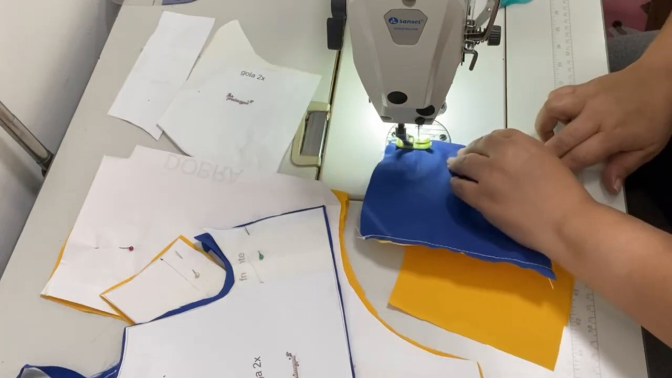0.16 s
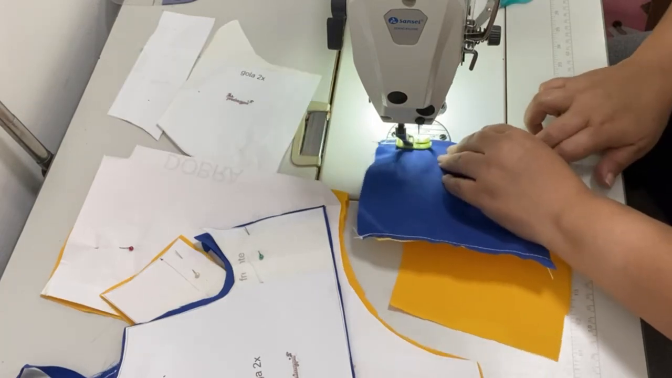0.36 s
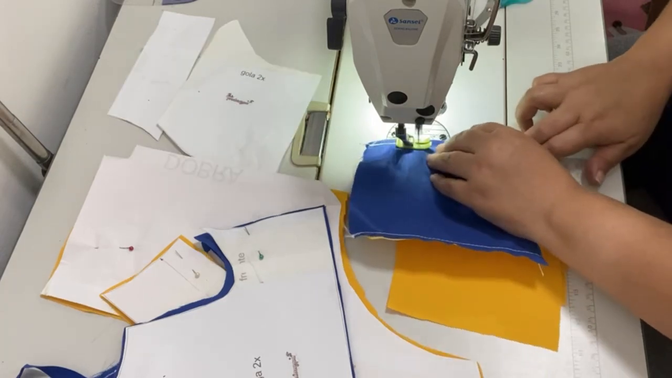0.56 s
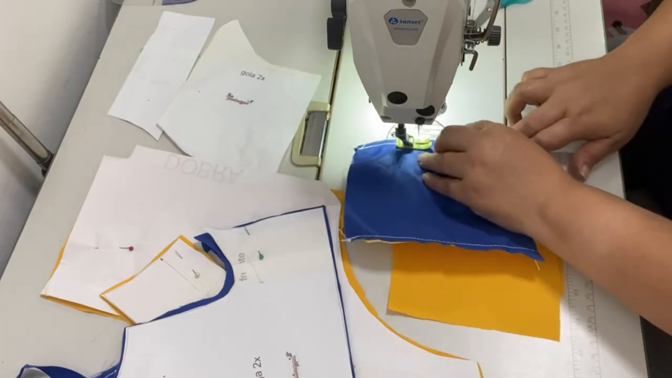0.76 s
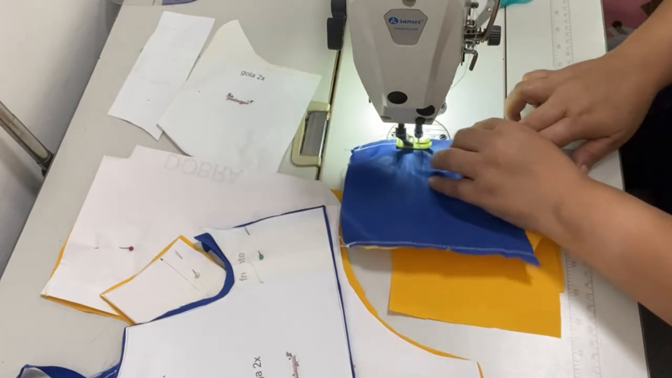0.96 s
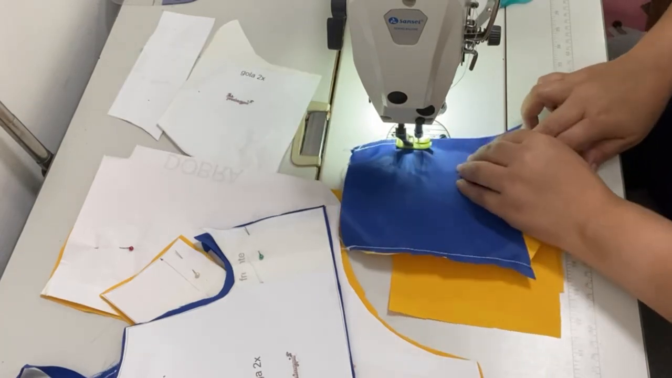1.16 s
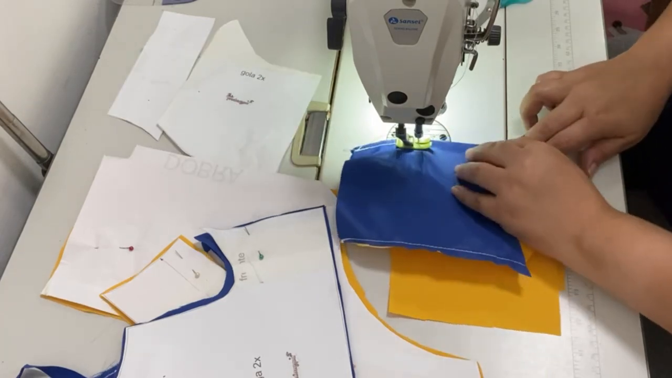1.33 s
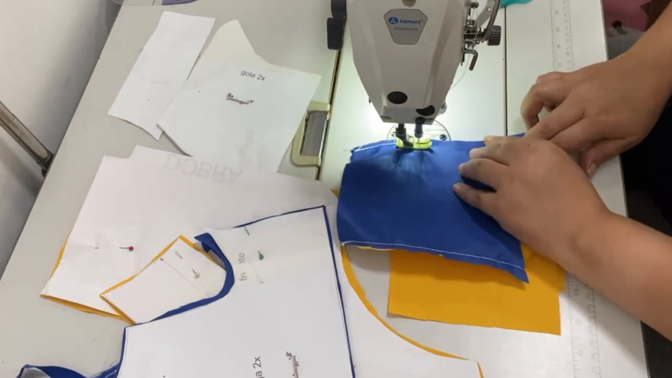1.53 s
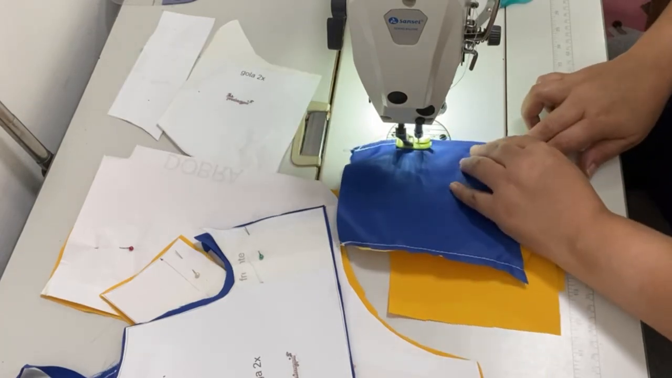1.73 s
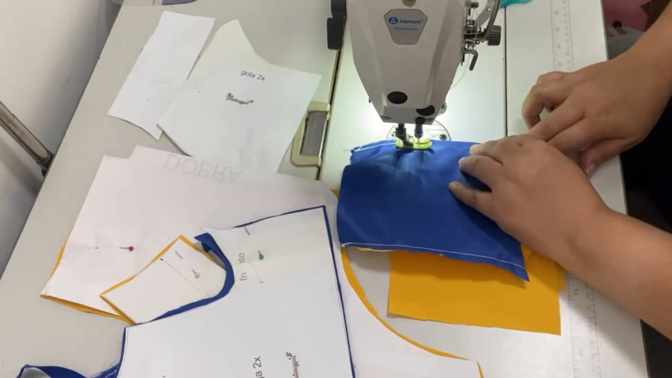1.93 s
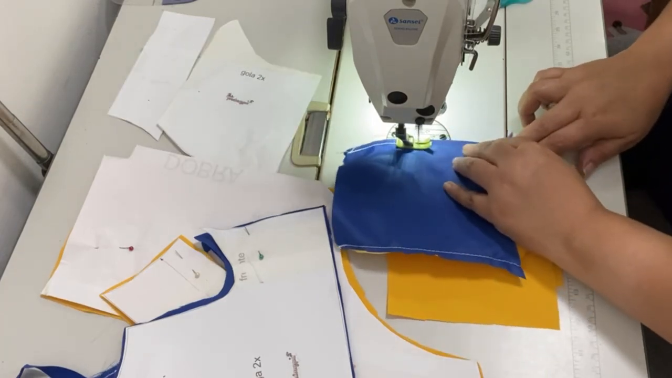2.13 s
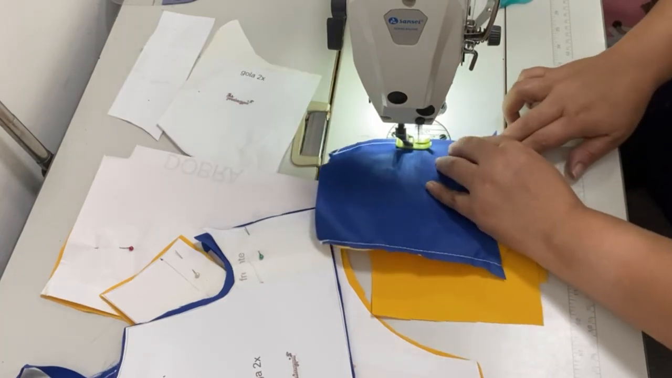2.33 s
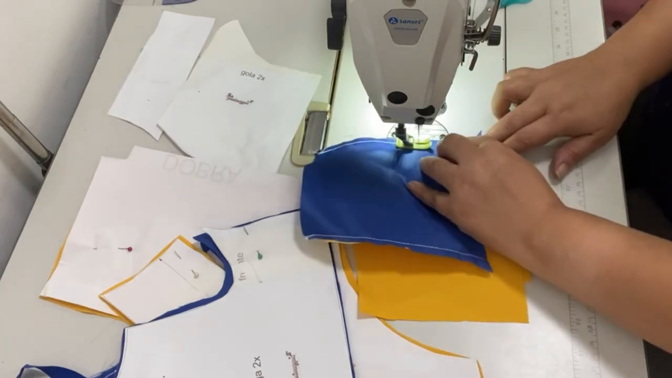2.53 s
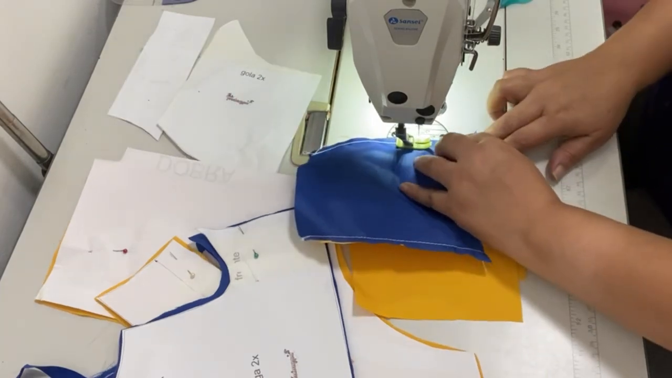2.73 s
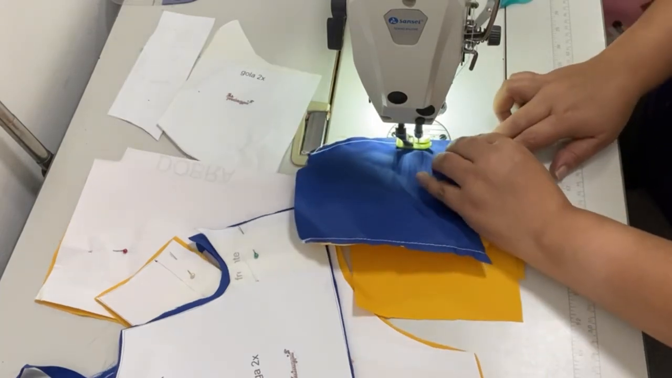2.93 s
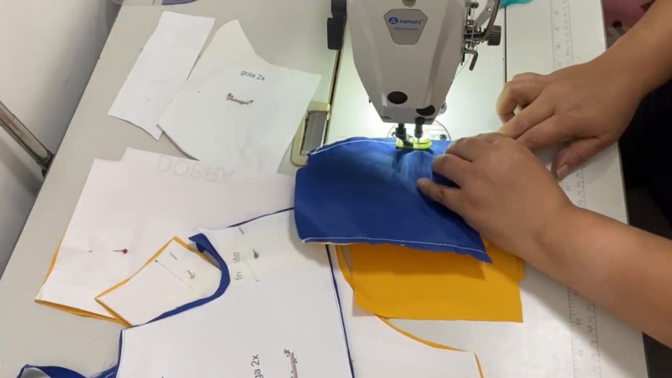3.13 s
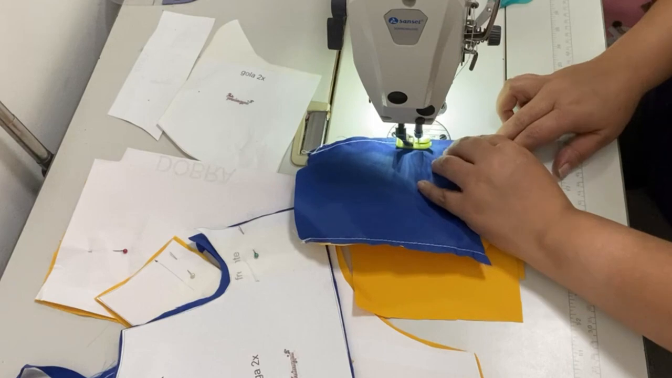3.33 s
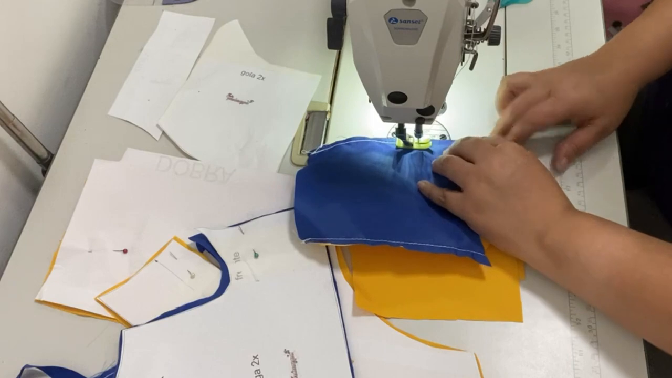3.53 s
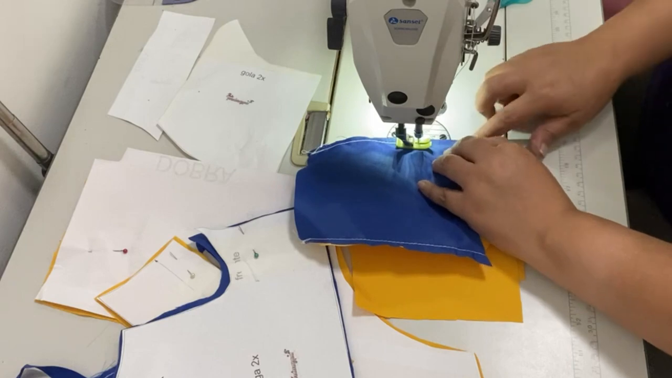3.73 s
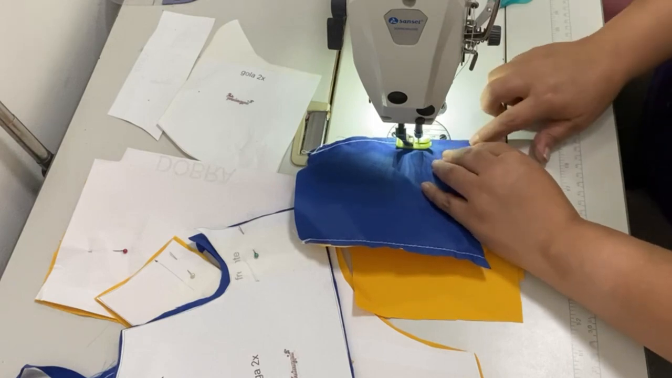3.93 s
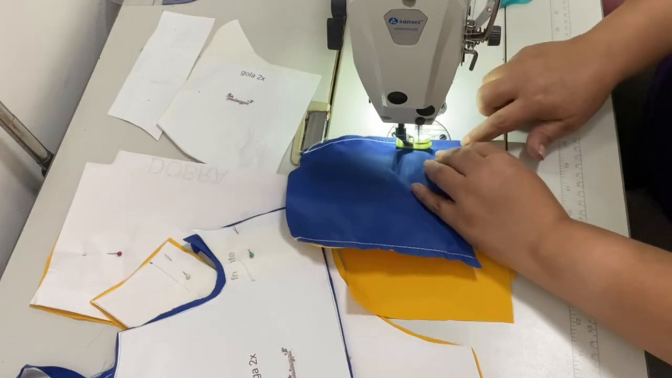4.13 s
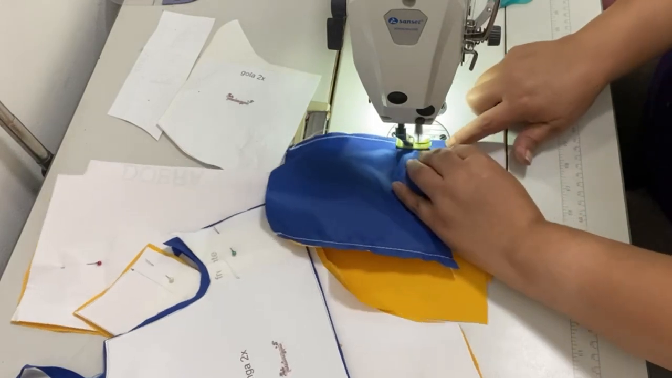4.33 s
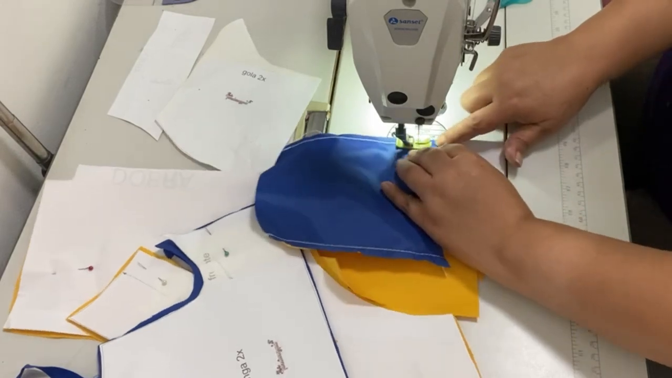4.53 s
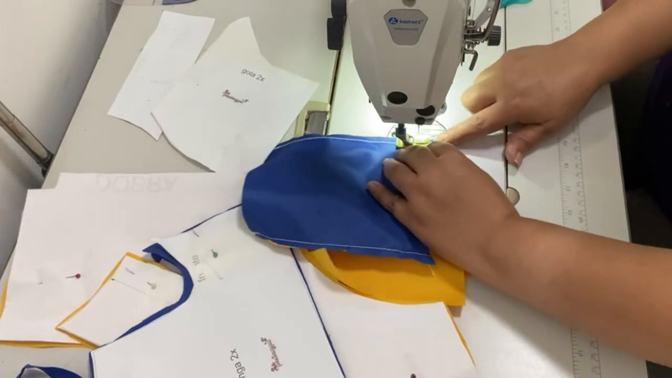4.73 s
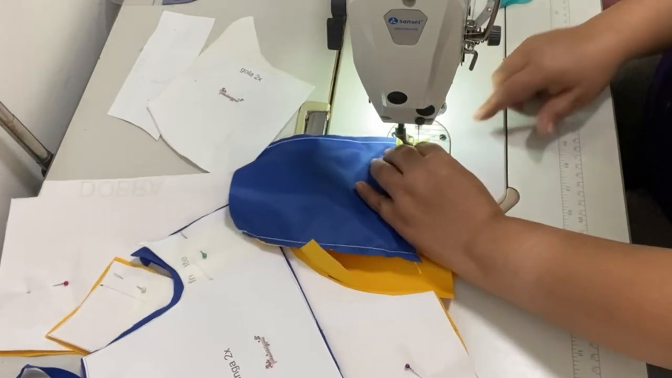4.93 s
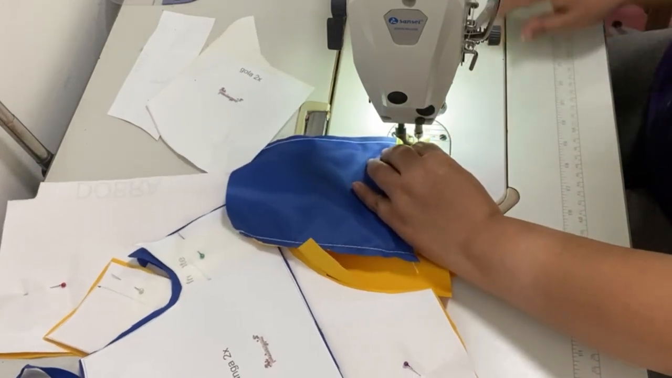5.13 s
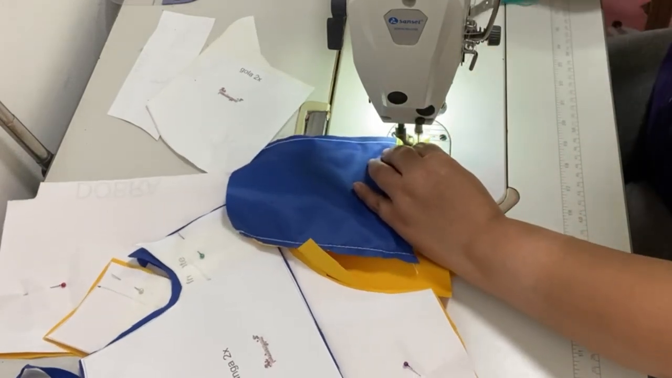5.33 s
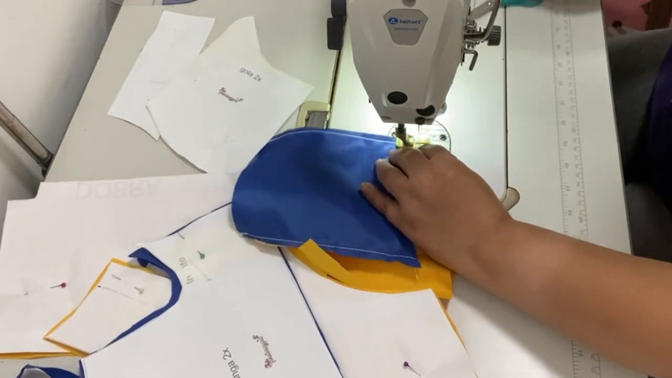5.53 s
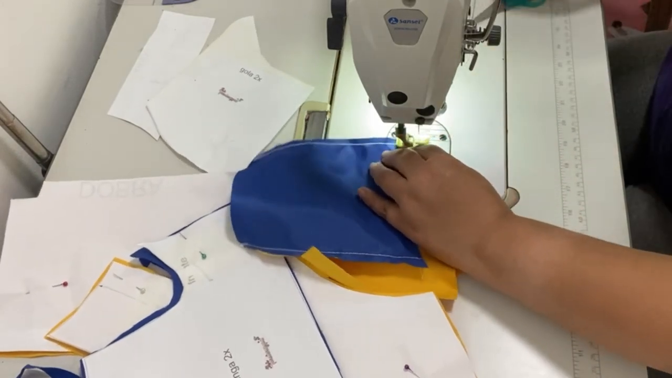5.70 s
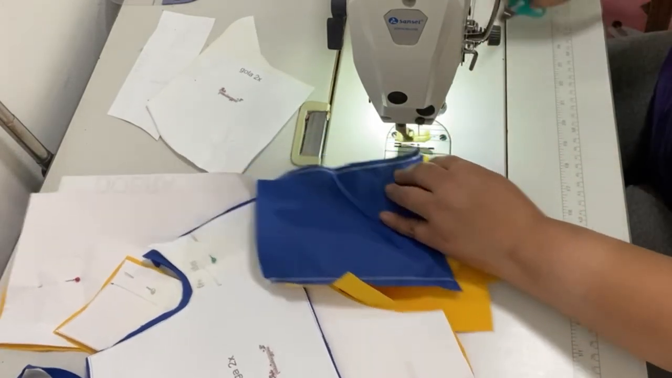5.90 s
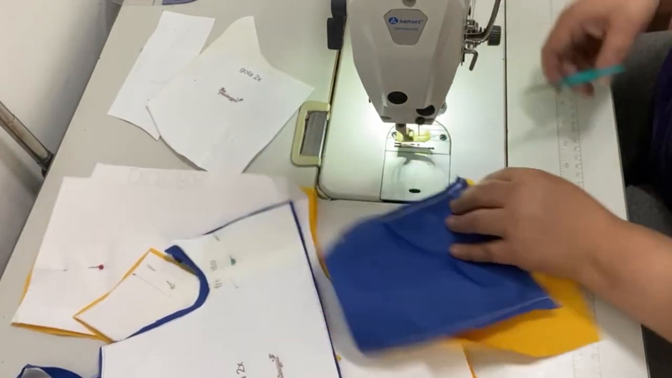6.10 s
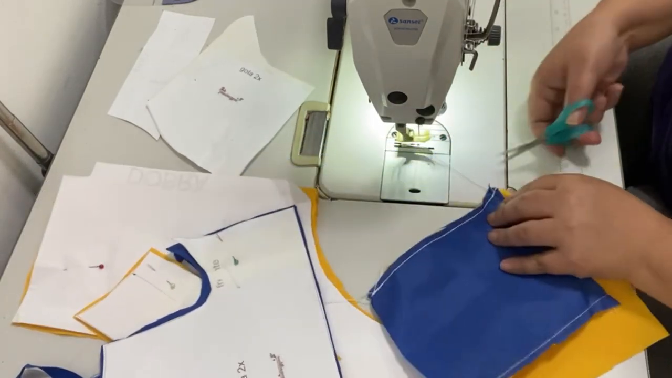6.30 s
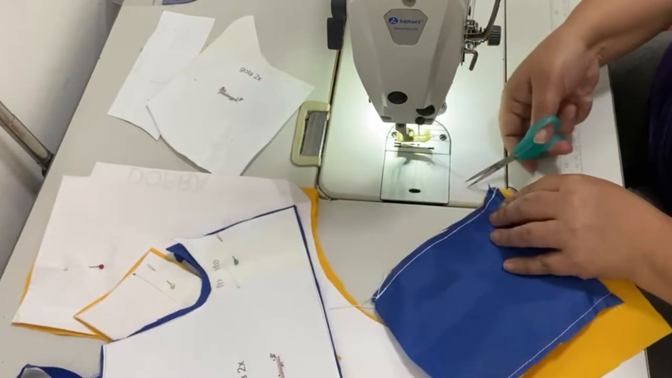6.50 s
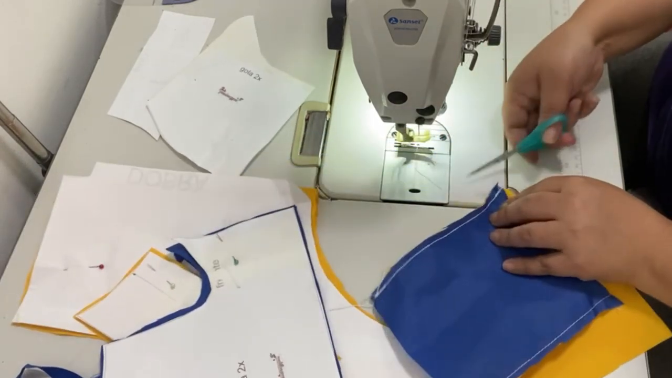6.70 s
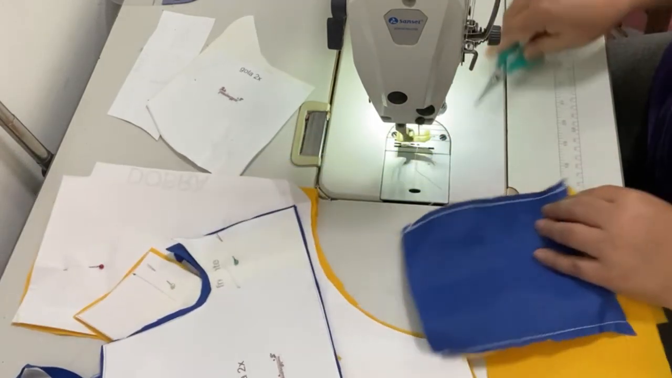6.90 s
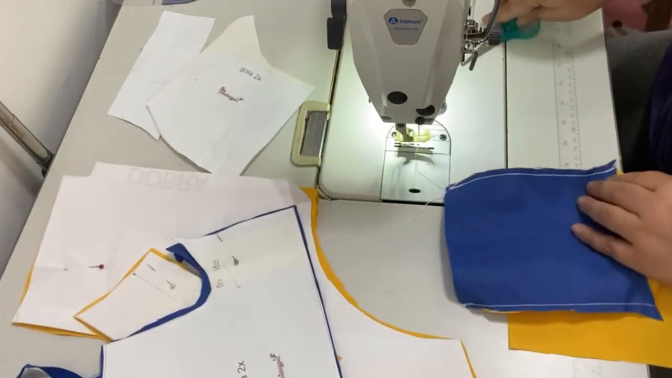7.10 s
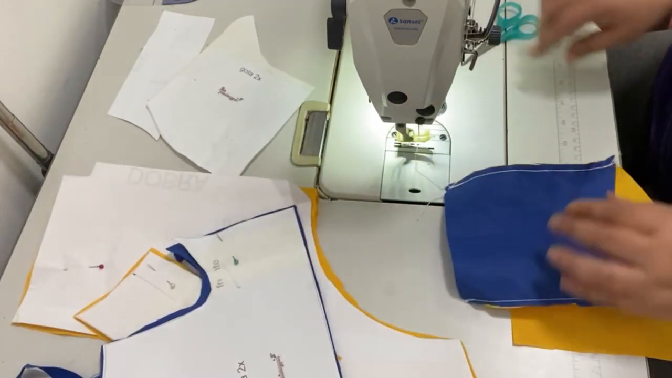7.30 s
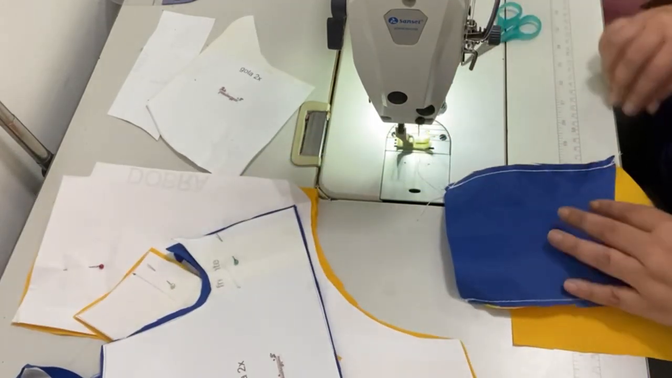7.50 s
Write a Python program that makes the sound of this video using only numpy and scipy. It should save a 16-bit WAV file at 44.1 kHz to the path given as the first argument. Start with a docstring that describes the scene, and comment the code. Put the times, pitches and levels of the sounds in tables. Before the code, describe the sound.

A small, fairly dry workroom, heard close in stereo, with a low wavering motor hum throughout. From 0.1 to 1 s an industrial sewing machine stitches: rapid snaps at up to eighteen a second, table thumps, linkage rattle and a pulsing drone, slowing into a dull booming treadle knock at 0.9 with a cloth rustle. Quiet hum, faint rubs and bumps follow. A faster run goes from 2 to 2.95, with a knock near 2.7 and a click at 2.8. After another pause, a third run lasts from 4 to 5.15. Pedal knocks and clicks cluster at 5.05-5.35, then a short back-tack rattles until 5.8 among hard metallic clacks at 5.35, 5.53 and 5.83. Cloth swishes out at 5.9, thread squeaks hoarsely downward around 6-6.2, then light scissor clicks, soft thuds and fabric slides until scissors land sharply, ringing, at 7.41.

```python
"""Sewing machine in a small workroom

Close stereo microphone, two ports: a motor hums while an industrial lockstitch machine sews three short runs,
then back-tacks among solenoid clacks. Each stitch is a needle snap over table thumps, a drone and linkage rattle;
the treadle knocks as it is worked. The presser foot lifts, cloth is drawn out with a thread squeak, scissors snip
and drop on the table. Noise bursts, tuned modes and sines make the sources; a short decaying tail is the room."""
import sys
import numpy as np
from scipy import signal
from scipy.fft import rfft, irfft, next_fast_len
from scipy.io import wavfile
from scipy.ndimage import uniform_filter1d, map_coordinates

SR = 44100
rng = np.random.default_rng(int(sys.argv[2]) if len(sys.argv) > 2 else 0)


def dump_mix(stems):
    """Bounce the given channels to the path in sys.argv[1] as a 16-bit WAV at rate SR."""
    frames = np.atleast_2d(stems).T  # one column per channel
    limited = np.clip(frames, -1, 1)  # hard clip at full scale
    pcm = np.round(limited * 32767).astype(np.int16)
    wavfile.write(sys.argv[1], SR, pcm)


N = 332955
TIME = np.arange(N) / SR

# Room decay: f/Hz, t60/s
ROOM_DECAY = [(150, 0.27), (1000, 0.31), (5000, 0.26), (14000, 0.21)]
# Microphone response, no subsonics and a soft top: f/Hz, level/dB
MICROPHONE_RESPONSE = [(8, -27.5), (26, 0), (14000, -1), (16400, -3)]
# Lead of the left port: f/Hz, phase/rad
PORT_LEAD = [(0, 0), (300, .5), (1200, .9), (2300, 3.1), (3900, 6.3), (5500, 9.4), (8100, 12.57),
             (10400, 15.71), (13000, 18.85), (15500, 22)]
# Likeness of the two ports: f/Hz, likeness/share
PORT_LIKENESS = [(600, 0), (2300, 0), (4000, 0), (5500, 0.29), (8100, 0.39), (10200, 1), (15000, .96)]
TOP_HZ = 16400

# Motor and stand hum: f/Hz, level/dB rms about which it wavers
HUM_LINES = [(57, -57), (64.5, -56.5), (95.5, -50), (265, -77)]
# Spectrum of the room's air, relative: f/Hz, level/dB per Hz
AIR_SPECTRUM = [(20, -21), (35, -12), (45, -13), (60, -7.5), (105, -6), (135, -11.5), (270, -27),
                (450, -40.5), (1000, -40), (2000, -44.5), (6000, -45.5), (10000, -56.5), (15000, -75.5)]
HUM_WAVER_DB, HUM_WAVER_RAD, HUM_WAVER_RATE = 4.5, 0.84, 13  # depth in level and phase; knots per s

# Cloth pushed or drawn over the bed: start t/s, length/s, level/dB
CLOTH_SLIDES = [(.88, 0.52, -57.5), (1.26, 0.32, -63), (1.47, 0.082, -54), (1.502, 0.22, -67.5),
                (1.76, 0.042, -64.5), (1.91, .14, -71), (2.954, 0.42, -81), (3.715, 0.28, -69),
                (5.876, 0.55, -45.5), (6.475, 0.25, -60.5), (6.707, 0.56, -55), (6.972, 0.31, -57.5),
                (7.253, 1, -51.5)]
# Spectrum of sliding fabric, relative: f/Hz, level/dB per Hz
WEAVE_SPECTRUM = [(150, 19.5), (400, 4), (1200, 0), (2200, 2), (4000, 2.5), (7000, 4), (10000, -4),
                  (14000, -5), (16000, -24.5)]
SLIDE_SKEW, SLIDE_EDGE = 0.56, 1.4  # a push peaks before its middle; softness of its ends

# Palms and sleeves on the table, foot on the treadle: start t/s, length/s, level/dB, centre f/Hz
RUBS = [(1.887, 0.28, -58.5, 650), (3.25, 0.27, -76, 1700), (1.917, .12, -71, 5500), (3.52, .16, -81, 1100),
        (3.863, 0.19, -60.5, 620), (6.07, .14, -52, 2000), (6.79, .12, -66, 750)]
# Soft bumps of hands and scissors on the table: t/s, level/dB
BUMPS = [(1.133, -49), (3.385, -68), (3.677, -57.5), (6.397, -49), (6.609, -48), (6.952, -45),
         (7.067, -41.5), (7.125, -51.5), (7.272, -47)]

# Squeak of thread pulled through its guides: t/s, f/Hz, level/dB
THREAD_SQUEAK = [(5.96, 1350, -70), (6.001, 1300, -52), (6.075, 1200, -57), (6.106, 1300, -49.5),
                 (6.15, 1137, -53), (6.18, 960, -65), (6.2, 800, -74)]
SQUEAK_RATE = 480  # random knots per s; they make the voice hoarse

# Light clicks of levers and scissors: t/s, level/dB before filtering and a cut of 10 dB, ring f/Hz
LIGHT_TICKS = [(0.087, -30.5, 3460), (0.941, -33, 4030), (1.993, -31.5, 3350), (2.8126, -19.5, 3000),
               (3.984, -32.5, 3400), (5.116, -27, 4000), (5.282, -18.5, 1310), (5.287, -14, 5000),
               (5.328, -22, 4060), (6.393, -40.5, 3700), (6.61, -31, 4020), (7.071, -22.5, 6860),
               (7.109, -35, 6800), (7.143, -35.5, 6820), (7.269, -35.5, 3000)]
TICK_T60, TICK_WIDTH_HZ = 0.025, 900  # s; width of a tick's ring

# Modes of the scissor blades: f/Hz, level/dB, t60/s
SCISSOR_MODES = [(4576, -10.5, .19), (5098, -2.5, .13), (6160, -5, 0.25), (6860, -6.5, .26),
                 (6885, -6.5, .26), (7800, -5.5, 0.093), (8700, -1.5, 0.14)]
SCISSORS_S, SCISSORS_DB = 7.414, -29  # the blades land

# Modes of the steel bed: f/Hz, level/dB, t60/s
BED_MODES = [(581, -6, 0.3), (715, -7, 0.27), (903, -1.5, 0.17), (1082, -2, 0.25), (1212, -5.5, 0.13),
             (1326, -5.5, 0.07), (1645, -7, 0.14), (1714, -5.5, 0.19), (1918, 1, 0.11), (1984, -0.5, .13),
             (2810, -8.5, 0.12), (4200, 0, 0.09)]
BED_RING_DB = -11  # bed ring against the plate's noise

# Modes of head and table: f/Hz, level/dB, t60/s, left-right level/dB
TABLE_MODES = [(39, -11.5, 0.078, 5), (60, -11.5, 0.12, 0), (93.5, 7, 0.13, 1.5), (115.3, -6, 0.46, 4),
               (155, -12, .6, 6), (185.9, -5.5, 0.41, 1), (219, -8.5, 0.087, 15.5), (273.7, -2, 0.22, 10),
               (307, -3.5, 0.096, 1), (342.5, -2.5, 0.14, 8.5), (400, -18.5, 0.25, -12),
               (511, -21, 0.22, -15.5), (620, -23, 0.2, -8)]
FOCUS_DB = 9  # modes an octave from a blow's pitch are this much weaker

# Treadle pressed or back at its stop: t/s, knock level/dB, boom level/dB, table shudder level/dB
TREADLE_MOVES = [(.019, -51.5, -42.5, -43.5), (.873, -25, -26.5, -37), (1.917, -63, -41.5, -45.5),
                 (2.682, -24.5, -26, -50), (3.891, -58, -40, -49.5), (5.059, -20, -33, -38),
                 (5.121, -34.5, -24.5, -53), (5.278, -31, -26.5, -47.5), (5.354, -19.5, -26, -38),
                 (5.811, -42, -29, -45.5)]
# Spectrum of the pedal's first contact, relative: f/Hz, level/dB per Hz
SLAP_SPECTRUM = [(200, -13.5), (600, -5.5), (1100, -1), (1700, -8), (2400, -16.5), (6000, -30),
                 (14000, -56)]
# Spectrum of the dull knock, relative: f/Hz, level/dB per Hz
PEDAL_SPECTRUM = [(90, 0), (330, 0), (550, -10), (1000, -11), (1600, -25.5), (2500, -26.5), (6000, -47),
                  (14000, -70.5)]
# Modes of the booming stand: f/Hz, level/dB, t60/s, attack/s
STAND_MODES = [(58, -8.5, 0.61, 0.016), (96.3, 6.5, 0.2, 0.015), (147, -8.5, 0.44, 0.032),
               (332.3, -15.5, 0.21, 0.0029), (431.5, -21.5, 0.2, 0.0008), (662, -24, 0.25, 0.0014)]
SLAP_DB, SLAP_T60, PEDAL_T60 = -5, 0.038, 0.19  # first contact against the dull knock; s
SHUDDER_T60 = 1  # s

# Solenoid blows, then scissors dropped on the table: t/s, crack level/dB, crack t60/s, ring f/Hz,
# crack's low edge f/Hz, plate level/dB, table level/dB before a cut of 10.5 dB, table f/Hz
STEEL_BLOWS = [(5.351, -10, 0.029, 2800, 500, -25, -10.5, 369),
               (5.529, -10.5, 0.051, 3450, 500, -17, -31, 290),
               (5.832, -20, 0.039, 4300, 500, -16.5, -24.5, 200),
               (7.413, -9.5, 0.042, 5200, 2620, -25, 1.5, 286.5),
               (7.4385, -13.5, 0.034, 7000, 3800, -26.5, -7.5, 290)]
# Spectrum of cracks and ticks, relative: f/Hz, level/dB per Hz
CRACK_SPECTRUM = [(500, -20), (1500, -6), (3000, -3.5), (5000, -1.5), (7200, -3), (9300, -6.5),
                  (11000, -10), (13500, -13), (16000, -30.5)]
# Spectrum of the bed plate, relative: f/Hz, level/dB per Hz
PLATE_SPECTRUM = [(180, -19.5), (400, -1.5), (600, -2), (800, -6.5), (1100, -7), (1800, -2), (2600, -10),
                  (6000, -47.5)]

# Shaft speed as the treadle is pressed and eased off, one table a run: t/s, speed/stitches per s
SEAM_1 = [(0.118, 0.0), (0.192, 10.5), (0.401, 18.2), (0.549, 16.5), (0.749, 16.2), (0.875, 8.1),
          (0.98, 0.0)]
# Second run: t/s, speed/stitches per s
SEAM_2 = [(2.023, 0.0), (2.107, 14.3), (2.23, 22.1), (2.465, 21.4), (2.57, 17.0), (2.68, 11.8), (2.89, 4.7),
          (2.97, 0.0)]
# Third run: t/s, speed/stitches per s
SEAM_3 = [(4.002, 0.0), (4.07, 13.5), (4.125, 11.0), (4.172, 21.3), (4.452, 15.8), (4.548, 16.8),
          (4.826, 13.9), (5.048, 8.4), (5.152, 0.0)]
# Back-tack: t/s, speed/stitches per s
BACKTACK = [(5.242, 0), (5.272, 13), (5.34, 11), (5.4, 17), (5.65, 16.5), (5.72, 12), (5.8, 0)]
SPEEDS = [SEAM_1, SEAM_2, SEAM_3, BACKTACK]
# Shaft travel before the needle first lands, one value a run: travel/turns
FIRST_STROKE = [.6, .6, .6, .37]
# Each run at full speed: table shake level/dB, rattle level/dB, needle snap level/dB,
# fading of the snaps/dB per s, drone level/dB
RUN_LEVELS = [(-31.5, -35.5, -15, 25, -35), (-32, -37, -14.5, 20, -40), (-31, -36, -17.5, 5.5, -36),
              (-34, -36.5, -23.5, 22, -34.5)]
FULL_SPEED = 20  # stitches per s
SHAKE_POWER, RATTLE_POWER, SNAP_POWER = 1.33, 1.31, 0.55  # strength grows as these powers of speed

# Gear whine at full speed: teeth per turn, level/dB rms about which it wavers
GEAR_TEETH = [(36, -54), (45, -51.5)]
GEAR_POWER, GEAR_FLUTTER = 3.8, .025  # growth with speed; unevenness of the speed as a share

# Droning resonances of the head at full speed: f/Hz, level/dB, left-right level/dB
HEAD_DRONE = [(280, -0.5, 8.5), (516.3, -14.5, -9.5)]
DRONE_POWER, DRONE_SAG = 1.3, .1  # growth with speed; share of the pitch lost towards standstill
DRONE_SWELL_DB, DRONE_SHARE = 6.5, .29  # swell within a turn, and where in the turn it peaks
DRONE_BEND, DRONE_WAVER_RAD = .035, .5  # pitch swing within a turn as a share; random phase waver

# Metal strokes within a turn: place/share of the turn, width/share, level/dB, low f/Hz, high f/Hz
METAL_STROKES = [(.035, .045, -41, 1000, 1500), (.22, .05, -43.5, 420, 640), (.3, .035, -36.5, 2300, 9500),
                 (.34, .07, -41.5, 7000, 13000), (.58, .035, -45, 850, 1350),
                 (.67, .03, -38.5, 4000, 10000), (.75, .05, -38, 1750, 2490), (.9, .05, -45.5, 2600, 4800)]
STROKE_POWER, STROKE_SCATTER_DB = .9, 3.5  # growth with speed; random drift of the level

# Thumps within a turn: place/share of the turn, level/dB, f/Hz around which the table shakes
CRANK_THUMPS = [(.06, -14.5, 285), (.2, -15.5, 380), (.1, -15, 89), (0.679, -10.5, 175)]
# Spectrum of the rattling linkage, relative: f/Hz, level/dB per Hz
RATTLE_SPECTRUM = [(200, -16.5), (450, 9.5), (700, 4.5), (1100, 7), (1600, 4.5), (2600, 4.5), (4400, 4.5),
                   (5700, 2), (7000, 2.5), (8600, 6), (10000, -7.5), (13000, -5), (15000, -12),
                   (16400, -22.5)]
# Thread trimmer, reverse feed and foot lifter load the linkage:
# start t/s, length/s, table shake level/dB, rattle level/dB
LEVER_LOADS = [(2.805, 0.14, -43.5, -62), (5.422, 0.35, -30, -34), (5.789, 0.089, -31, -35)]
KNOCK_DB = -15  # crank knocks against the rattle
THUMP_SCATTER_DB, KNOCK_SCATTER_DB = 3.5, 7.5  # chance from stroke to stroke

# Spectrum of the needle snap, relative: f/Hz, level/dB per Hz
SNAP_SPECTRUM = [(400, -24), (1300, 2.5), (3000, -2), (6000, 3.5), (8500, 6), (11000, 4.5), (14000, 6),
                 (16400, -8.5)]
# Needle bar modes, rung at each stroke: f/Hz, level/dB, t60/s
NEEDLE_BAR_MODES = [(1186, -4, 0.027), (1318, -6, .04), (1996, -5, 0.16), (2760, 2.5, .03)]
# Tough spots in the cloth: t/s, extra snap level/dB
TOUGH_SPOTS = [(.468, 3), (.528, 7), (2.219, 2.5), (2.264, 5), (2.401, 7), (2.496, 11), (4.205, 3.5),
               (4.254, 2), (4.484, 6), (4.803, 5)]
SNAP_T60, SNAP_SCATTER_DB = 0.011, 0.5  # s; chance from stitch to stitch
NEEDLE_BAR_DB = -17  # against the snap


def amp(db):
    """Decibels to gain."""
    return 10 ** (np.asarray(db) / 20)


def unit(x):
    """Scaled to rms 1."""
    return x / np.sqrt(np.mean(x ** 2) + 1e-20)


def along(points, hz):
    """Values of (f/Hz, value) points on a log frequency axis."""
    f, v = np.transpose(points)
    return np.interp(np.log(hz + 1), np.log(f + 1), v)


def wobble(rate, size=20):
    """A smooth random curve with rate knots a second."""
    coarse = TIME[::size]
    knots = rng.standard_normal(int(N * rate / SR) + 4)
    return np.interp(TIME, coarse, map_coordinates(knots, [coarse * rate]))


def sine(phase):
    """Sine of rms 1."""
    return np.sqrt(2) * np.sin(phase)


def pan(db):
    """Left and right gains for a level difference."""
    return amp([[db / 2], [-db / 2]])


def convolve(x, response):
    """Convolution by channel, cut to the scene's length."""
    return signal.fftconvolve(np.atleast_2d(x), np.atleast_2d(response), axes=1)[:, :N]


def bandpass(x, edges_hz):
    """Keeps the band between two edges."""
    return signal.sosfilt(signal.butter(2, edges_hz, "bandpass", fs=SR, output="sos"), x)


def resonate(x, hz, q):
    """One narrow resonance."""
    return signal.lfilter(*signal.iirpeak(hz, q, fs=SR), x)


def colour(x, spectrum, ripple_db=0, size=8192):
    """Minimum-phase filter of unit energy; ripple stands for a casting's close resonances, unlike at each port."""
    hz = np.fft.rfftfreq(size, 1 / SR)
    ripple = np.tanh(unit(uniform_filter1d(rng.standard_normal((2, len(hz))), size=11)))
    cepstrum = irfft(np.log(amp(along(spectrum, hz) + ripple_db * ripple)))
    # folding the cepstrum makes the response causal
    cepstrum[:, 1:size // 2] *= 2
    cepstrum[:, size // 2 + 1:] = 0
    response = irfft(np.exp(rfft(cepstrum)))
    return convolve(x, response / np.linalg.norm(response, axis=1, keepdims=True))


def noise(alike_hz=700):
    """Stereo noise, shared in the bass and unrelated in the treble."""
    size = next_fast_len(N, real=True)
    hz = np.fft.rfftfreq(size, 1 / SR)
    turn = np.arccos(1 / (1 + (hz / alike_hz) ** 2)) / 2
    mid, side = rfft(rng.standard_normal((2, size))) * [np.cos(turn), np.sin(turn)]
    return irfft([mid + side, mid - side], size)[:, :N]


def bursts(rows):
    """Envelope of (t/s, level/dB, t60/s) blows: sudden start, exponential decay cut at half a second."""
    out, t = np.zeros(N + SR), np.arange(SR // 2) / SR
    for s, db, t60 in rows:
        out[round(s * SR):][:len(t)] += amp(db - 60 * t / t60)
    return out[:N]


def impulses(times, db):
    """One push of the given level at each time."""
    return np.bincount(np.round(np.asarray(times) * SR).astype(int), amp(db), N)[:N]


def ring(hz, db, t60, attack):
    """One decaying mode, cut at half a second."""
    t = np.arange(SR // 2) / SR
    return amp(db - 60 * t / t60) * np.sin(2 * np.pi * hz * t) * (1 - np.exp(-t / attack))


def stroke(start, length):
    """Envelope of one push: it swells and dies away."""
    out = np.zeros(N)
    during = (TIME > start) & (TIME < start + length)
    progress = (TIME[during] - start) / length
    out[during] = np.abs(np.sin(np.pi * progress ** SLIDE_SKEW)) ** SLIDE_EDGE
    return out


def runs():
    """For each run: speed as a share of full speed, and shaft turns counted from the first needle stroke."""
    for curve, first in zip(SPEEDS, FIRST_STROKE):
        speed = np.interp(TIME, *np.transpose(curve))
        yield speed / FULL_SPEED, np.cumsum(speed) / SR - first


def whole_speed():
    """Speed of all the runs as a share of full speed."""
    return sum(speed for speed, _ in runs())


def whole_shaft():
    """Shaft turns of whichever run is moving."""
    return sum(turns * (speed > 0) for speed, turns in runs())


def passes(turns, share):
    """The samples at which the shaft passes a given share of its turn."""
    return np.flatnonzero(np.diff(np.floor(turns - share)) > 0)


def room(x):
    """The walls answer 4 ms late with a noise tail; each frequency dies at its own speed."""
    hz, t, z = signal.stft(rng.standard_normal((2, SR // 2)), SR, nperseg=256)
    decay = amp(-60 * t / along(ROOM_DECAY, hz)[:, None])
    tail = signal.istft(z * decay, SR, nperseg=256)[1]
    tail = tail / np.linalg.norm(tail[0])
    return convolve(x, np.pad(tail, ((0, 0), (round(.004 * SR), 0))))


def hum():
    """The idling motor's sines waver in level and phase over the noise of the room's air."""
    lines = 0
    for hz, db in HUM_LINES:
        level = amp(db + HUM_WAVER_DB * wobble(HUM_WAVER_RATE))
        lines = lines + level * sine(2 * np.pi * hz * TIME + HUM_WAVER_RAD * wobble(HUM_WAVER_RATE))
    air = amp(-55.5) * unit(colour(noise(alike_hz=600), AIR_SPECTRUM))
    return lines * pan(3.3) + air * pan(2.5)


def cloth():
    """Fabric slides over the bed: noise broken into small catches."""
    level = sum(amp(db) * stroke(s, length) for s, length, db in CLOTH_SLIDES)
    catches = noise() * amp(1.1 * wobble(190) + 2.3 * wobble(35))
    return level * unit(colour(catches, WEAVE_SPECTRUM))


def hands():
    """Rubs are swelling bands of noise, soft bumps are dull decaying bursts."""
    grit = noise(alike_hz=882)
    rubs = 0
    for s, length, db, hz in RUBS:
        rubs = rubs + amp(db) * stroke(s, length) * unit(bandpass(grit, [hz / 1.5, hz * 1.5]))
    bumps = bursts([(s, db, .22) for s, db in BUMPS])
    return rubs + colour(bumps * grit, PEDAL_SPECTRUM, ripple_db=9.0)


def squeak():
    """Thread squeaks hoarsely as the cloth is drawn out: a falling tone with random quadrature amplitudes."""
    s, hz, db = np.transpose(THREAD_SQUEAK)
    phase = 2 * np.pi * np.cumsum(np.interp(TIME, s, hz)) / SR
    voice = [wobble(SQUEAK_RATE) * np.cos(phase) + wobble(SQUEAK_RATE) * np.sin(phase) for _ in range(2)]
    return np.array(voice) * np.interp(TIME, s, amp(db), left=0, right=0)


def ticks():
    """Levers and scissor blades click lightly: a noise burst, each with a brief resonance of its own."""
    grit, out = noise(alike_hz=2500), np.zeros((2, N))
    for s, db, hz in LIGHT_TICKS:
        start = round(s * SR)
        span = slice(start, start + SR // 10)
        blow = grit[:, span] * amp(db - 10.0 - 60 * (TIME[span] - s) / TICK_T60)
        out[:, span] += blow + amp(0.5) * resonate(blow, hz, hz / TICK_WIDTH_HZ)
    return colour(out, CRACK_SPECTRUM, ripple_db=3.5)


def treadle():
    """The pedal slaps, a longer and duller knock follows, and the modes of the stand boom."""
    s, knock_db, boom_db, _ = np.transpose(TREADLE_MOVES)
    grit = noise(alike_hz=1112)
    slaps = bursts([(at, db + SLAP_DB, SLAP_T60) for at, db in zip(s, knock_db)])
    knocks = bursts([(at + 0.003, db, PEDAL_T60) for at, db in zip(s, knock_db)])
    slap = colour(slaps * grit, SLAP_SPECTRUM, ripple_db=5.0)
    knock = colour(knocks * grit, PEDAL_SPECTRUM, ripple_db=7.5)
    boom = convolve(impulses(s + 0.002, boom_db + 6), sum(ring(*mode) for mode in STAND_MODES))
    return slap + knock + boom * pan(2.5)


def table(pushes, attack, focus_hz):
    """Head and table top ring under a train of pushes, most strongly in the modes near focus_hz."""
    modes = 0
    for k, (hz, db, t60, lr) in enumerate(TABLE_MODES):
        focused_db = db - FOCUS_DB * abs(np.log2(hz / focus_hz))
        modes = modes + (-1) ** k * pan(lr) * ring(hz, focused_db, t60, attack)
    return convolve(pushes, modes)


def bed(pushes):
    """Damped steel modes, reaching each port at their own strength."""
    modes = sum(pan(rng.normal(0, 4)) * ring(hz, db, t60, attack=.0004) for hz, db, t60 in BED_MODES)
    return convolve(pushes, modes)


def scissors():
    """The blades' modes ring from the moment they land."""
    blades = sum(pan(rng.normal(0, 3)) * ring(hz, db, t60, attack=.0004) for hz, db, t60 in SCISSOR_MODES)
    return convolve(impulses([SCISSORS_S], [SCISSORS_DB]), blades)


def clacks():
    """Solenoids and dropped scissors: a crack with its ring, blades, bed plate; and the table thumps apart."""
    grit, crack, thumps = noise(alike_hz=3400), 0, 0
    for s, db, t60, ring_hz, edge_hz, _, table_db, table_hz in STEEL_BLOWS:
        blow = uniform_filter1d(bursts([(s, db, t60)]), size=50) * grit
        blow = signal.lfilter(*signal.butter(1, edge_hz, "highpass", fs=SR), blow)
        crack = crack + blow + 1.8 * resonate(blow, ring_hz, 8)
        thumps = thumps + table(impulses([s], [table_db - 10.5]), attack=0.00035, focus_hz=table_hz)
    s, *_, plate_db, _, _ = np.transpose(STEEL_BLOWS)
    plate_blows = bursts([(at, db, .08) for at, db in zip(s, plate_db)])
    plate = colour(plate_blows * noise(alike_hz=1464), PLATE_SPECTRUM, ripple_db=5.5)
    plate = plate + bed(impulses(s, plate_db + BED_RING_DB))
    return amp(1.5) * colour(crack, CRACK_SPECTRUM, ripple_db=2.5) + scissors() + plate, thumps


def gears():
    """Meshing teeth whine at the tooth rate, loudest near top speed, on a slightly fluttering speed."""
    speed = whole_speed()
    turns = np.cumsum(FULL_SPEED * speed * (1 + GEAR_FLUTTER * wobble(40))) / SR
    whine = sum(amp(db + 1.8 * wobble(30)) * sine(2 * np.pi * teeth * turns) for teeth, db in GEAR_TEETH)
    return speed ** GEAR_POWER * whine


def drone():
    """The feed drives the head's resonances in one swell a turn; their pitch sags as the shaft slows."""
    speed = whole_speed()
    angle = 2 * np.pi * (whole_shaft() - DRONE_SHARE)
    drive = sum(amp(row[-1]) * run_speed ** DRONE_POWER for (run_speed, _), row in zip(runs(), RUN_LEVELS))
    swell_db = DRONE_SWELL_DB * np.cos(angle)
    bend = -DRONE_BEND * np.sin(angle)  # the pitch falls through each swell
    out = 0
    for hz, db, lr in HEAD_DRONE:
        pitch = hz * (1 + DRONE_SAG * (speed - 1) + bend)
        phase = 2 * np.pi * np.cumsum(pitch) / SR + DRONE_WAVER_RAD * wobble(45)
        out = out + pan(lr) * amp(db + swell_db + 1.0 * wobble(14)) * sine(phase)
    return drive * out


def links():
    """Needle bar, take-up lever, feed and hook clash: noise bands, each at its own point of the turn."""
    shaft = whole_shaft()
    drive = whole_speed() ** STROKE_POWER
    grit, out = noise(alike_hz=2500), 0
    for share, width, db, low_hz, high_hz in METAL_STROKES:
        offset = (shaft - share + .5) % 1 - .5
        contact = drive * np.exp(-(offset / width) ** 2) * amp(db + STROKE_SCATTER_DB * wobble(13))
        # the level holds whatever the width of the band
        out = out + bandpass(grit * contact, [low_hz, high_hz]) * np.sqrt(SR / 2 / (high_hz - low_hz))
    return out


def chatter(pushes, width_hz, scatter_db):
    """Each contact excites the bed's resonances in its own random balance, damped to width_hz."""
    hits = np.flatnonzero(pushes)
    out = 0
    for k, (hz, db, _) in enumerate(BED_MODES):
        chance_db = scatter_db * np.tanh(rng.standard_normal(len(hits)))
        sizes = pushes * impulses(hits / SR, db + chance_db)
        out = out + (-1) ** k * pan(rng.normal(0, 4)) * resonate(sizes, hz, hz / width_hz)
    return unit(signal.lfilter(*signal.butter(2, 5500, fs=SR), out))


def mechanism():
    """Cranks thump the table and links rattle, one shaft turn a stitch, all harder with speed."""
    shaking = bursts([(s, db, SHUDDER_T60) for s, _, _, db in TREADLE_MOVES])
    rattling, pushes, shake = 0, 0, 0
    shaft = whole_shaft()
    for (speed, _), (shake_db, rattle_db, *_) in zip(runs(), RUN_LEVELS):
        shaking = shaking + amp(shake_db) * speed ** SHAKE_POWER
        rattling = rattling + amp(rattle_db) * speed ** RATTLE_POWER
    for s, length, shake_db, rattle_db in LEVER_LOADS:
        shaking = shaking + amp(shake_db) * stroke(s, length)
        rattling = rattling + amp(rattle_db) * stroke(s, length)
    for share, db, hz in CRANK_THUMPS:
        at = np.concatenate([passes(turns, share) for _, turns in runs()])
        thumps = impulses(at / SR, db + THUMP_SCATTER_DB * rng.standard_normal(len(at)))
        rumble = amp(-46.5) * rng.standard_normal(N)
        shake = shake + table(thumps + rumble, attack=0.0043, focus_hz=hz)
        pushes = pushes + thumps
    # evened out, so that the shaking curve sets the level
    power = uniform_filter1d(np.mean(shake ** 2, axis=0), size=6000)
    shake /= np.sqrt(np.abs(power) + 1e-12)
    # the table shakes hardest just after each needle stroke
    shake *= amp(1.2 * np.cos(2 * np.pi * (shaft - .3)))
    # play in the joints makes many tiny contacts, thickest just after the needle enters
    waves_db = 0.52 * np.cos(2 * np.pi * (shaft - .2))
    contacts = noise(alike_hz=1800) * amp(3.6 * wobble(420) + 2.3 * wobble(130) + waves_db)
    rattle = unit(colour(contacts, RATTLE_SPECTRUM, ripple_db=6.0))
    # every crank thump also knocks in the bed
    knocks = amp(KNOCK_DB) * chatter(pushes, width_hz=90, scatter_db=KNOCK_SCATTER_DB)
    return shake * shaking, (rattle + knocks) * rattling


def needle():
    """A bright snap and a needle bar knock once a turn: harder with speed and at tough spots, fading in a run."""
    tough_db = sum(db * (np.abs(TIME - s) < 1 / (2 * FULL_SPEED)) for s, db in TOUGH_SPOTS)
    snaps = []
    for (speed, turns), (_, _, snap_db, fade, _) in zip(runs(), RUN_LEVELS):
        at = passes(turns, 0)
        speed_db = SNAP_POWER * 20 * np.log10(speed[at])
        level = snap_db + speed_db - fade * (at - at[0]) / SR + tough_db[at]
        level = level + SNAP_SCATTER_DB * rng.standard_normal(len(at))
        snaps += [(s, db, SNAP_T60) for s, db in zip(at / SR, level)]
    s, db, _ = np.transpose(snaps)
    knock = 0
    for mode in NEEDLE_BAR_MODES:
        blows = impulses(s, db + NEEDLE_BAR_DB + 2.5 * rng.standard_normal(len(s)))
        knock = knock + convolve(blows, ring(*mode, attack=.0003))
    return colour(bursts(snaps) * noise(alike_hz=3000), SNAP_SPECTRUM, ripple_db=4.0) + knock


def scene():
    """Machine, hands and hum in the workroom."""
    shake, rattle = mechanism()
    cracks, thumps = clacks()
    snaps = needle()
    small = rattle + links() + gears() + ticks() + cloth() + squeak() + hands()
    echo = room(amp(-8.5) * small + amp(-10.0) * snaps + amp(-7.0) * cracks)
    return hum() + echo + treadle() + thumps + shake + drone() + small + cracks + snaps


def record(dry):
    """Two close ports hear the treble alike, the left first; high peaks are rounded, the band ends at TOP_HZ."""
    size = next_fast_len(N + SR)
    hz = np.fft.rfftfreq(size, 1 / SR)
    left, right = rfft(dry, size)
    alike = np.clip(along(PORT_LIKENESS, hz), 0, .99)
    mid = (left + right) / 2 * np.sqrt(1 + alike)
    side = (left - right) / 2 * np.sqrt(1 - alike)
    lag = np.exp(-1j * np.interp(hz, *np.transpose(PORT_LEAD)))
    ports = np.array([mid + side, (mid - side) * lag])
    heard = irfft(ports * amp(along(MICROPHONE_RESPONSE, hz)), size)
    soft = heard / (1 + heard ** 4) ** (1 / 4)
    return irfft(rfft(soft) * (hz < TOP_HZ), size)[:, :N]


dry = scene()
out = record(dry)
dump_mix(out)
```